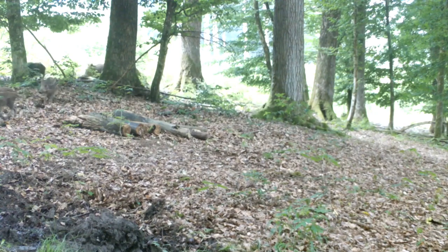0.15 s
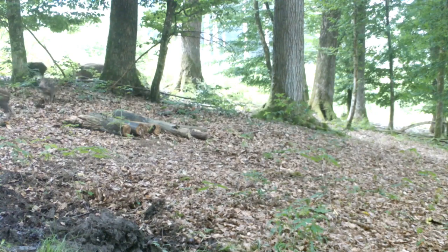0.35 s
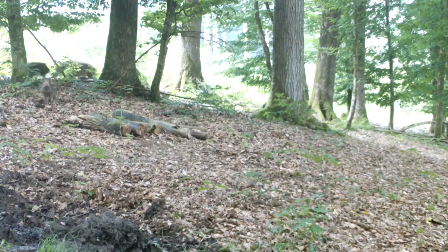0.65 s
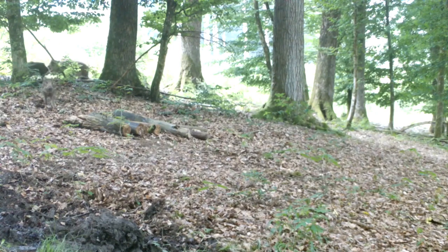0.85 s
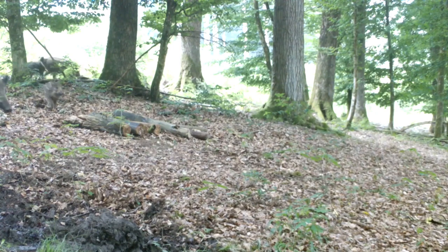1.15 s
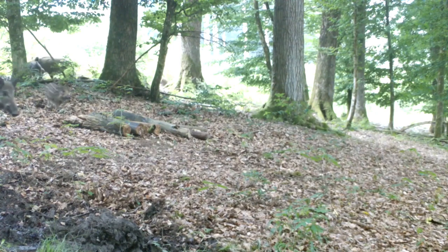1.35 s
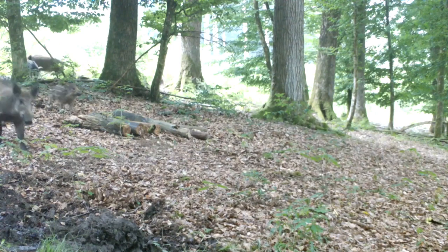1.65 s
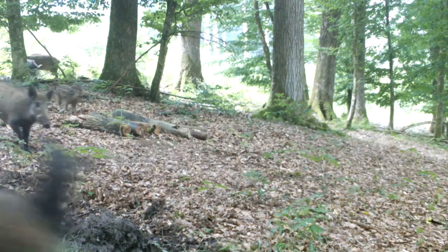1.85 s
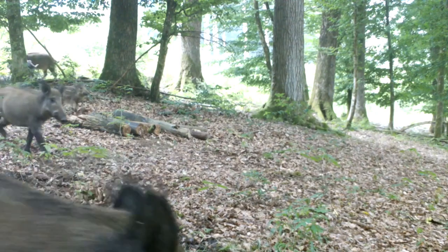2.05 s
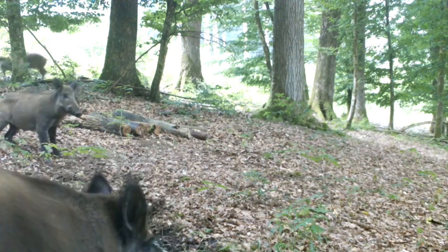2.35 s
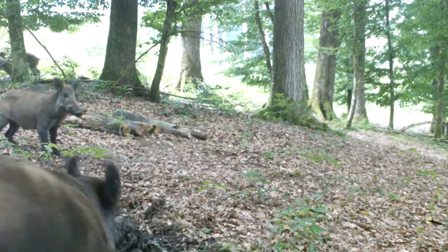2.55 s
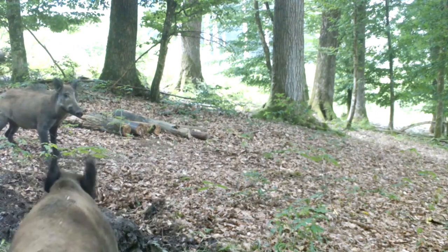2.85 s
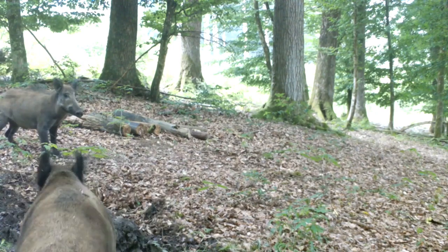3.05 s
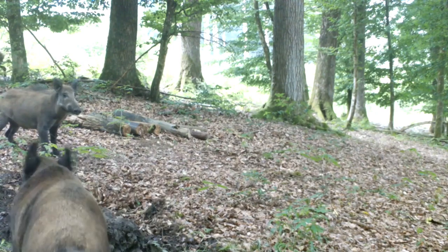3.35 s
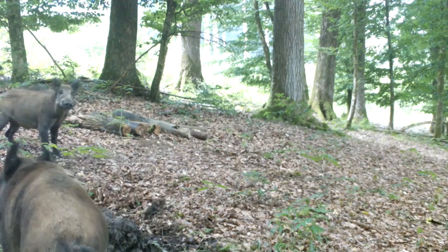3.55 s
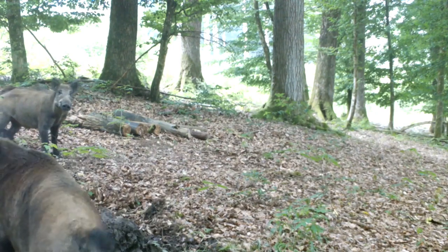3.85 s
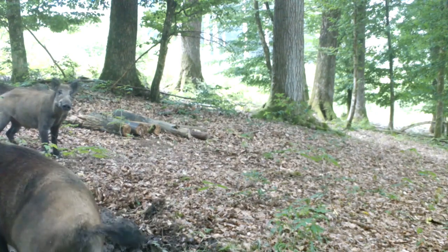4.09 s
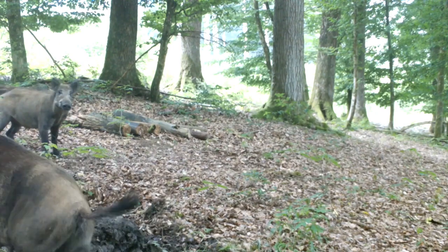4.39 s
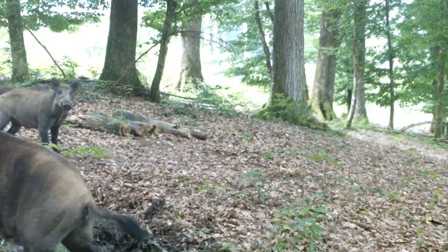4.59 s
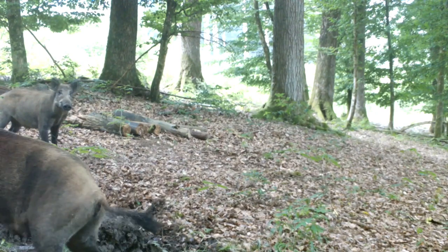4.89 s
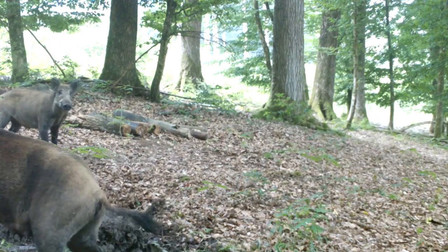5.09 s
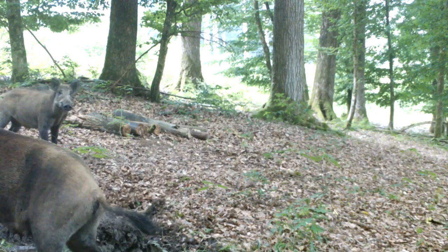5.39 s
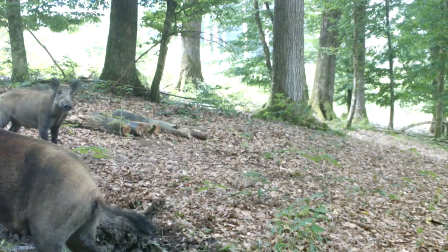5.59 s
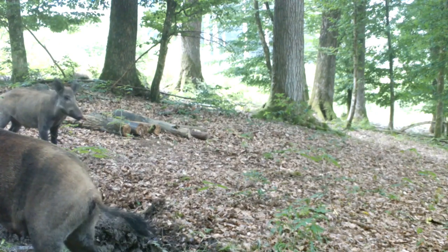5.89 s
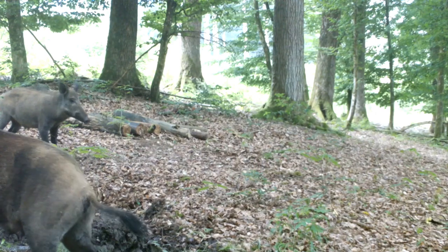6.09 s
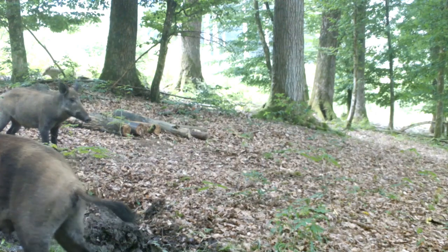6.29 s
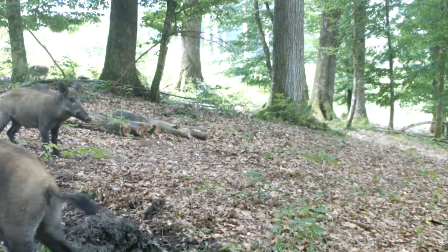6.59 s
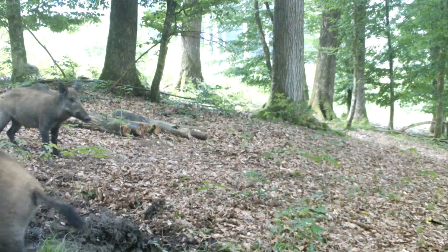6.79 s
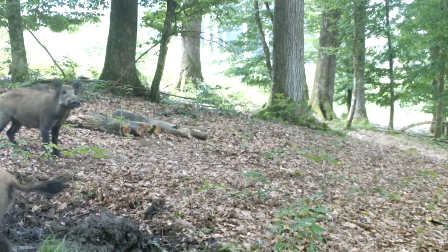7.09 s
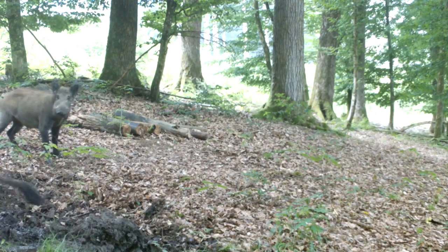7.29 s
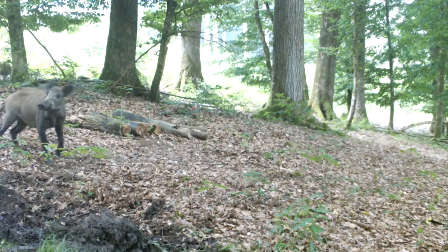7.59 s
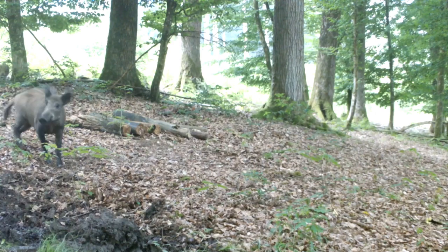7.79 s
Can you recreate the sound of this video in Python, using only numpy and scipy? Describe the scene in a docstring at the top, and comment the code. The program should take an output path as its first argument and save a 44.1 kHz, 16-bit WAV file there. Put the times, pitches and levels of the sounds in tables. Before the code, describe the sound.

Boars rustle through crackling dry leaves, snorting close by and knocking hard on the microphone housing, before the wood quietens to faint bird whistles.

```python
"""Wild boars rooting in dry leaves

Boars root about beside a camera fixed low in a wood; leaves crackle as clustered noise bursts.
Snorts are fluttering noise through throat and nostril resonances; knocks ring the housing's modes.
Twigs snap as decaying impulses through a resonance, and hoofs thud as brief low sines.
Distant birds whistle warbling, echoed sines over faint shaped-noise hiss and a low wavering hum."""
import sys
import numpy as np
from scipy import signal
from scipy.fft import rfft, irfft
from scipy.io import wavfile

SR = 44100
rng = np.random.default_rng(int(sys.argv[2]) if len(sys.argv) > 2 else 0)


def transcribe(signal):
    """Save signal, clipped to [-1, 1], as a 16-bit WAV file at the path in sys.argv[1]."""
    frames = np.atleast_2d(signal).T
    limited = np.clip(frames, -1, 1)
    pcm = np.round(limited * 32767).astype(np.int16)
    wavfile.write(sys.argv[1], SR, pcm)


N = 350154

# Spectrum of still air and microphone hiss: (frequency [Hz], relative density [dB per Hz])
AIR_SPECTRUM = [(12, -39.5), (20, -6.5), (53, -15.5), (66, -9.5), (85, -9.5), (209, -19), (247, -19),
                (674, -28.5), (775, -26), (1110, -30.5), (2720, -33.5), (2960, -31.5), (3400, -33),
                (5950, -29), (15800, -40.5)]
AIR_DB = -63
# Level of the hum: (time [s], level [dB])
HUM_LEVEL = [(0, -66.5), (1, -60.5), (3.002, -71.5), (4.2, -63), (5.3, -64.5), (6.8, -67.5), (7.9, -76.5)]
HUM_HZ = 86

# Spectra of crisp top leaves and the coarse litter beneath: (frequency [Hz], relative density [dB per Hz])
CRISP_SPECTRUM = [(100, -22.5), (400, -22.5), (1300, -22.5), (2000, -30), (3300, -13.5), (4400, -15),
                  (5600, 0), (7400, -1), (8800, -8), (10300, -15.5), (12000, -17.5), (15500, -27.5)]
COARSE_SPECTRUM = [(200, -24), (800, -11), (1300, -8.5), (1800, -18), (2400, -10), (2900, -3.5), (3550, 0),
                   (4100, -7), (6000, -31), (12000, -55.5)]
# Treble of the crisp leaves against their duller part: (time [s], level [dB])
DRYNESS = [(0, 0), (0.7, -4.5), (1.8, 4), (2.6, -3.5), (3.4, -9.5), (4.101, -1.5), (4.85, -7.5), (5.5, -1),
           (6.9, -3), (7.4, 0), (7.9, -4.5)]
# Leaves stirred steadily, before the leaf gains:
# (time [s], crisp level [dB], coarse crunch relative to crisp [dB])
STIRRING = [(0, -50.5, -10), (0.4, -51, -11), (1.0, -51.5, -14), (1.5, -51, -12), (1.8, -39, -10.5),
            (2.3, -41.5, -20), (2.9, -45.5, -15), (3.2, -47.5, -13.5), (3.58, -54, -7.5),
            (4.05, -55, -12.5), (4.601, -54.5, -12), (5.2, -60, -15.5), (5.38, -66, -8.5), (5.9, -65, -8.5),
            (6.15, -60.5, -10), (6.6, -58, -12), (7.2, -52, -11.5), (7.9, -51.5, -17.5)]
# Hoof or snout pressing into leaves, before the leaf gains:
# (start [s], time under load [s], crisp level [dB], coarse crunch relative to crisp [dB])
STEPS = [(0.01, 0.027, -42, -20), (0.095, 0.16, -43, -18), (0.31, 0.019, -47, -13),
         (0.64, 0.037, -51.5, -14), (1.11, .05, -49.5, -6), (1.365, 0.045, -36, -14),
         (1.435, 0.032, -41.5, -14), (1.74, 0.086, -35.5, -16), (1.895, 0.037, -29, -24),
         (1.965, 0.024, -34.5, -20), (2.047, 0.049, -31, -12.5), (2.085, 0.038, -24, -12.5),
         (2.12, 0.064, -20.5, -18.5), (2.22, 0.17, -36.5, -16), (2.41, 0.053, -36, -19),
         (2.52, 0.055, -39, -16.5), (2.74, 0.044, -43, -9.5), (2.794, 0.028, -39.5, -15),
         (2.995, .04, -50, -3), (3.04, 0.046, -39.5, -11), (3.3, 0.036, -50.5, -22),
         (4.12, 0.055, -49.5, -14.5), (4.275, 0.048, -42, -6), (4.395, 0.043, -49.5, -8.5),
         (4.645, 0.033, -52.5, -13), (4.79, .11, -55, -23.5), (6.66, 0.085, -54, -4),
         (6.755, .095, -55, -8.5), (6.94, .075, -48, -7.5), (7.281, 0.069, -47.5, -16),
         (7.38, .05, -47, -11), (7.519, 0.1824, -49.5, -16.5), (7.829, 0.023, -47, -2.5)]
PRESS_S, SETTLE_S = 0.017, 0.025  # rise of the load; decay constant once it is lifted

# Snorts and grunts: (start [s], length [s], level [dB], rise [s], sag over the length [dB],
# nearness [0-1], starting throat resonance [Hz], its relative level [dB], nostril hiss relative level [dB])
SNORTS = [(0.075, .064, -60.5, .023, 11, 0.8, 277, 7, -10),
          (0.95, .13, -34.5, 0.053, -0.5, .985, 260, -5.5, -4.5),
          (1.294, 0.087, -43, .03, 3.5, 0.94, 390, 1, 4), (1.502, .06, -44, .035, -4, 0.94, 516, 1.5, 6.5),
          (1.514, 0.39, -33.5, 0.059, 12.5, 0.64, 786, -3, 6.5),
          (4.173, 0.21, -60, 0.12, -7.5, 0.06, 340, -4, -13),
          (6.217, 0.35, -48, .13, 4, 0.08, 420, -18, -0.5), (6.478, 0.1, -67, .03, -2, 0.2, 416, 5.5, -15),
          (6.962, 0.13, -70, 0.059, -0.5, 0, 340, 5, -12)]
# Spectra of the snout close up, the snout a few steps off, the nostril jet and the puff of air:
# (frequency [Hz], relative density [dB per Hz])
NEAR_SNOUT = [(50, -15), (150, -6.5), (300, 1), (620, 3.5), (900, 0), (1250, -7), (1550, -12), (2400, -17),
              (3200, -11.5), (4500, -8.5), (9000, -41)]
FAR_SNOUT = [(120, -13), (270, 6.5), (450, 6.5), (750, -6.5), (1050, 6), (1320, 7), (1550, -13), (1950, 1),
             (2400, -5), (2750, 6.5), (3500, 3.5), (3800, -27), (6000, -45), (12000, -28)]
NOSTRIL_JET = [(1500, -34), (3000, -6.5), (4600, -5), (5700, 4), (7300, 2.5), (8500, -4), (10000, -13),
               (12000, -14.5), (15500, -25)]
PUFF_SPECTRUM = [(10, -13), (25, -11), (36, 4), (50, -1), (70, -15), (150, -9), (600, -61.5)]
RELEASE_SHARE, THROAT_END = 0.43, 0.87  # share of length spent dying away; final / initial resonance
WHISTLE_DB, WHISTLE_LOSS_DB = -0.5, 47  # nostril whistle at nearness 1; loss at nearness 0
PUFF_DB, PUFF_LOSS_DB = -4, 77  # the same for the puff that buffets the microphone

# Twigs snapping: (time [s], level [dB], ring [Hz], dull body relative level [dB], decay constant [s])
SNAPS = [(0.1525, -38.5, 7500, -6.5, .0023), (0.4828, -34.5, 7300, -21, .003),
         (0.6558, -31, 6800, -12.5, 0.00095), (1.442, -29.5, 7700, -27, 0.0069),
         (1.788, -22, 8000, -19, .0018), (1.8549, -6, 7400, -17.5, 0.0017),
         (1.9033, -35, 6500, -8.5, 0.0088), (2.046, -27.5, 5570, -15, 0.0053),
         (2.1307, -21, 7000, -26, .0055), (2.245, -26, 7160, -13, .002), (2.4062, -35, 3140, -3.5, 0.0048),
         (2.4452, -26, 3350, -1, 0.0011), (2.8084, -35, 5400, -8, 0.0025), (3.067, -26.5, 6300, -5, 0.0029),
         (3.32, -48.5, 2400, -20, 0.0032), (3.4282, -38.5, 6000, -24.5, .0014),
         (3.602, -51.5, 2250, -4.5, 0.0048), (3.7386, -37.5, 7300, -11.5, 0.0012),
         (4.114, -39, 5840, -10.5, 0.0015), (4.2836, -31, 8600, -25, .0015),
         (4.3062, -26, 7600, -13, 0.0024), (4.343, -47, 2900, -19, .003), (4.413, -38.5, 2880, -18, 0.002),
         (4.4462, -33.5, 6040, -27, .0045), (4.663, -38.5, 5850, -29, 0.0081),
         (6.691, -36, 6200, -11, 0.0019), (6.7188, -36.5, 5800, -11.5, 0.0018),
         (6.989, -42, 6300, -17, .0022), (7.105, -41, 2940, -14, 0.0076), (7.357, -27, 6700, -31, 0.0027),
         (7.783, -38.5, 3400, -22, 0.0038), (7.797, -42.5, 3070, -15, 0.0054),
         (7.8342, -33.5, 6100, -29, 0.0099)]
# Spectrum of the dull twig body: (frequency [Hz], relative density [dB per Hz])
TWIG_BODY = [(60, -6), (180, 0.5), (330, 2), (700, -1), (1300, 1), (2100, -11), (2800, 2), (5000, -9.5),
             (12000, -9)]

# Snout against the housing: (time [s], ring [dB], clatter [dB], hardness as cut-off [Hz],
# clatter decay constant [s], weight of the lowest modes [dB])
KNOCKS = [(0.779, -39, -29.5, 1890, 0.0081, -14), (0.8116, -3.5, -11, 2750, 0.0058, -12.5),
          (0.916, -41, -33, 1780, 0.013, -8), (1.159, -12, -16, 3386, 0.0066, -9),
          (1.1709, 2, 1.5, 8500, 0.0045, -5.5), (1.282, -28, -31.5, 2010, 0.0055, -3),
          (1.563, -7.5, -12.5, 2880, 0.0053, -26)]
# Modes of the housing: (frequency [Hz], relative level [dB], time to fall 60 dB [s])
HOUSING_MODES = [(790, -9, .05), (1000, -10, .035), (1403, -25, .09), (1600, -25, .04), (1775, -24, .05),
                 (2172, -26, .07), (2298, -22, .065), (2490, -20, .04), (2600, -22, .05), (3009, -27, .07),
                 (3262, -24, .068), (3355, -23, .08), (3635, -19, .06), (3919, -26, .11), (4108, -20, .065),
                 (4730, -19, .04), (5358, -20, .05), (5991, -17, .11), (6255, -24, .07), (6410, -18, .06),
                 (7122, -22, .08), (7516, -27, .19), (8203, -33, .095), (8823, -27, .097), (9293, -31, .11),
                 (9820, -30, .11)]
# Spectrum of the clatter: (frequency [Hz], relative density [dB per Hz])
CLATTER_SPECTRUM = [(40, -21), (180, -7.5), (460, -8), (600, -20), (820, 3.5), (1250, -9), (2700, 0.5),
                    (4000, -0.5), (6300, 0), (7200, -6), (10000, -16.5), (15500, -21.5)]

# Heavy footfalls on soft ground: (start [s], level [dB], frequency [Hz], length [s])
THUDS = [(1.781, -39, 71.5, 0.037), (1.844, -43, 94, 0.043), (2.075, -47, 82, .09), (2.235, -56, 65, 0.089),
         (2.41, -46, 108, 0.036), (2.441, -48.5, 48, 0.033)]

# Distant birds: (start [s], length [s], start pitch [Hz], end pitch [Hz], level before the echo mix [dB])
BIRDS = [(3.694, 0.37, 7290, 7190, -53.5), (4.058, .22, 5180, 5205, -53.5),
         (4.751, 0.27, 5600, 5600, -56.5), (4.911, .2, 7250, 7480, -54.5), (5.15, 0.17, 4860, 4900, -60),
         (5.371, 0.097, 4920, 4880, -65.5), (5.336, .25, 3590, 3640, -76), (5.692, .09, 2950, 2920, -70),
         (5.879, .11, 3463, 4410, -62), (7.05, .22, 5240, 5140, -60.5)]
# Rms warble at the reference pitch; it grows as this power of the starting pitch
WARBLE_HZ, WARBLE_AT_HZ, WARBLE_POWER = 24.8, 4980, 4

# Dips of the microphone's port: (centre [Hz], width [Hz], depth [0-1])
PORT_DIPS = [(880, 230, 0.5), (1985, 480, 0.4), (3894, 420, 0.3), (6320, 1300, 0.2), (10200, 540, 0.2)]
EDGE_HZ = 16000  # upper band limit


def amp(db):
    """Level law: 20 dB is a factor of ten in amplitude."""
    return 10 ** (np.asarray(db) / 20)


def unit(x):
    """Power normalisation: scales to rms 1."""
    return x / np.sqrt(np.mean(x ** 2) + 1e-20)


def add(mix, s, sound):
    """Superposition: adds a sound to the mix at time s."""
    part = mix[max(round(s * SR), 0):][:len(sound)]
    part += sound[:len(part)]


def colour(x, points):
    """Minimum-phase filtering: shapes a spectrum causally, keeping the power of white noise."""
    hz, db = np.transpose(points)
    grid = np.fft.rfftfreq(4096, 1 / SR) + 1
    gain = unit(amp(np.interp(np.log(grid), np.log(hz), db)))
    log_gain = np.log(np.r_[gain, gain[-2:0:-1]])
    # The Hilbert transform of the log gain gives the minimum phase
    taps = np.fft.ifft(np.exp(np.conj(signal.hilbert(log_gain)))).real
    return signal.oaconvolve(x, taps[:len(taps) // 2])[:len(x)]


def wander(n, rate_hz):
    """Band-limited chance: Gaussian low-pass noise of rms 1."""
    hz = np.fft.rfftfreq(n, 1 / SR)
    spectrum = rfft(rng.standard_normal(n)) * np.exp(-(hz / rate_hz) ** 2)
    return unit(irfft(spectrum, n))


def swell(t, length, rise, fall):
    """Smooth onset and release: squared-sine rise and fall."""
    onset = np.sin(np.pi / 2 * np.clip(t / rise, 0, 1)) ** 2
    release = np.sin(np.pi / 2 * np.clip((length - t) / fall, 0, 1)) ** 2
    return onset * release


def resonate(x, hz, width_hz):
    """Damped resonance: shifts a moving centre to zero, applies two equal poles and shifts back."""
    turn = np.exp(2j * np.pi * np.cumsum(hz * np.ones(len(x))) / SR)
    r = np.exp(-np.pi * width_hz / SR)
    return unit((turn * signal.lfilter([1], [1, -2 * r, r * r], x / turn)).real)


def background(waver_hz=0.76, waver_db=1.5):
    """Stationary noise and frequency modulation: even hiss beside a hum wavering in pitch and level."""
    turns = np.cumsum(HUM_HZ + waver_hz * wander(N, 11)) / SR
    hum = unit(np.sin(2 * np.pi * turns) * amp(waver_db * wander(N, 4.1)))
    hum_db = np.interp(np.arange(N) / SR, *np.transpose(HUM_LEVEL))
    hiss = colour(rng.standard_normal(N), AIR_SPECTRUM)
    return amp(hum_db) * hum + amp(AIR_DB) * hiss


def footwork():
    """Addition of powers: each step's load swells, holds and settles over steady stirring."""
    t = np.arange(N) / SR
    times, stir_db, crunch_db = np.transpose(STIRRING)
    crisp_db = np.interp(t, times, stir_db)
    coarse_db = np.interp(t, times, stir_db + crunch_db)
    power = amp([crisp_db, coarse_db]) ** 2
    t = t[:SR // 2]
    for s, length, db, crunch_db in STEPS:
        press = np.sin(np.pi / 2 * np.minimum(t / PRESS_S, 1))
        load = press * np.exp(-np.maximum(t - length, 0) / SETTLE_S)
        add(power[0], s, (amp(db) * load) ** 2)
        add(power[1], s, (amp(db + crunch_db) * load) ** 2)
    return np.sqrt(power)


def crackle(per_s, spread_db, bed):
    """Random fracture: tiny bursts of very unequal size over a blur of leaves sliding."""
    fractures = rng.random(N) < per_s / SR
    sizes = amp(spread_db * np.minimum(rng.exponential(1, N), 3.5)) * fractures
    # Each fracture's energy decays with a constant of 0.6 ms
    energy = signal.lfilter([1], [1, -np.exp(-1 / (0.0006 * SR))], sizes ** 2)
    return unit(np.sqrt(energy / energy.mean() + abs(bed)) * rng.standard_normal(N))


def leaves(crisp_level, coarse_level, split_hz=6500, uneven_db=1.0, uneven_hz=22):
    """Modulated fracture noise: crisp leaves and coarse litter give way unevenly under the animals."""
    crisp = colour(crackle(per_s=910, spread_db=3.0, bed=0.64), CRISP_SPECTRUM)
    crisp = crisp * crisp_level * amp(uneven_db * wander(N, uneven_hz))
    coarse = colour(crackle(per_s=510, spread_db=3.0, bed=0.26), COARSE_SPECTRUM)
    coarse = coarse * coarse_level * amp(uneven_db * wander(N, uneven_hz))
    dull = signal.sosfiltfilt(signal.butter(3, split_hz, fs=SR, output="sos"), crisp)
    # Half the tilt lifts the treble, half lowers the rest
    tilt = amp(np.interp(np.arange(N) / SR, *np.transpose(DRYNESS)) / 2)
    tilted = dull / tilt + (crisp - dull) * tilt
    return amp(-3.5) * tilted + amp(-4) * coarse


def ticks(activity, per_s, low_hz, high_hz, cycles, sharpness, spread_db, tick_db, most_db=12):
    """Buckling resonators: small pitched ticks, louder as the animals move more."""
    out = np.zeros(N)
    t = np.arange(SR // 50) / SR
    push = np.minimum(activity / np.median(activity), amp(most_db))
    for place, pitch, size in rng.random((int(per_s * N / SR), 3)):
        hz = low_hz * (high_hz / low_hz) ** pitch
        flick = rng.standard_normal(len(t)) * np.exp(-t * hz / cycles)
        tick = signal.lfilter(*signal.iirpeak(hz, sharpness, fs=SR), flick)
        level = push[int(place * N)] * amp(tick_db - spread_db * np.log(size + 0.058))
        add(out, place * N / SR, level * tick / abs(tick).max())
    return out


def snorts(flutter_hz=140, flutter_db=1.5, throat_width_hz=260, whistle_hz=5950, whistle_width_hz=1000):
    """Turbulent source and resonator: fluttering air excites throat and snout, with whistle and puff near."""
    out = np.zeros(N)
    t = np.arange(SR // 2) / SR
    for s, length, db, rise, sag_db, near, throat_hz, throat_db, hiss_db in SNORTS:
        flutter = unit(amp(flutter_db * wander(len(t), flutter_hz)))
        # Six independent noises share one flutter
        near_air, far_air, throat_air, jet_air, whistle_air, puff_air = (
            rng.standard_normal((6, len(t))) * flutter)
        far = 1 - near
        snout = np.sqrt(near) * colour(near_air, NEAR_SNOUT) + np.sqrt(far) * colour(far_air, FAR_SNOUT)
        gliding_hz = throat_hz * np.interp(t, [0, length], [1, THROAT_END])
        throat = amp(throat_db) * resonate(throat_air, gliding_hz, throat_width_hz)
        jet = amp(hiss_db) * colour(jet_air, NOSTRIL_JET)
        whistle = resonate(whistle_air, whistle_hz, whistle_width_hz)
        whistle *= amp(WHISTLE_DB - WHISTLE_LOSS_DB * far)
        puff = amp(PUFF_DB - PUFF_LOSS_DB * far) * unit(colour(puff_air, PUFF_SPECTRUM))
        breath = swell(t, length, rise, RELEASE_SHARE * length) * amp(db - sag_db * t / length)
        add(out, s, (snout + throat + jet + whistle + puff) * breath)
    return out


def snaps(sharpness=6.4, scatter_db=-20, scatter_s=0.011, spike=0.21, spike_s=0.00022, crack_db=-13,
          top_hz=9800, top_at_db=-32, octave_db=24):
    """Sudden release of strain: twigs crack, ring and stir leaves; litter muffles the faint ones."""
    out = np.zeros(N)
    t = np.arange(SR // 12) / SR
    for s, db, hz, body_db, decay in SNAPS:
        shape = np.exp(-t / decay) + spike * np.exp(-t / spike_s)
        crack, thump = shape * rng.choice([-1, 1], (2, len(t)))
        ring = signal.lfilter(*signal.iirpeak(hz, sharpness, fs=SR), crack)
        ring = np.sqrt(np.mean(shape ** 2)) * unit(ring)
        sharp_crack = amp(crack_db) * np.diff(crack, prepend=0) / 2
        body = amp(body_db) * colour(thump, TWIG_BODY)
        stirred = colour(rng.standard_normal(len(t)) * np.exp(-t / scatter_s), CRISP_SPECTRUM)
        # The cut-off rises one octave for each octave_db of level
        cutoff_hz = min(top_hz * 2 ** ((db - top_at_db) / octave_db), SR / 2.2)
        litter = signal.butter(2, cutoff_hz, fs=SR)
        snap = ring + sharp_crack + body + amp(scatter_db) * stirred
        add(out, s, amp(db) * signal.lfilter(*litter, snap))
    return out


def knocks(build=.0018, low_hz=1200):
    """Modal excitation: each nudge makes the housing clatter and ring; soft contact loses the treble."""
    out = np.zeros(N)
    t = np.arange(SR // 4) / SR
    attack = 1 - np.exp(-(t / build) ** 2)
    for s, ring_db, clatter_db, hard_hz, decay, weight_db in KNOCKS:
        ring = np.zeros(len(t))
        for hz, db, t60 in HOUSING_MODES:
            mode_level = amp(db + weight_db * (hz < low_hz) - 60 * t / t60)
            ring += mode_level * np.sin(2 * np.pi * (hz * t + rng.random()))
        clatter = colour(rng.standard_normal(len(t)) * np.exp(-t / decay), CLATTER_SPECTRUM)
        contact = signal.butter(3, hard_hz, fs=SR)
        blow = attack * (amp(ring_db) * ring + amp(clatter_db) * clatter)
        add(out, s, signal.lfilter(*contact, blow))
    return out


def thuds():
    """Heavily damped motion: soft ground gives for a few cycles under a hoof."""
    out = np.zeros(N)
    for s, db, hz, length in THUDS:
        t = np.arange(0, length, 1 / SR)
        add(out, s, amp(db) * np.sin(2 * np.pi * hz * t) * np.sin(np.pi * t / length) ** 2)
    return out


def birds(t60=.7):
    """Frequency modulation and scattering: thin warbling whistles smeared by echoes from the trunks."""
    out = np.zeros(N)
    for s, length, start_hz, end_hz, db in BIRDS:
        t = np.arange(0, length, 1 / SR)
        warble = WARBLE_HZ * (start_hz / WARBLE_AT_HZ) ** WARBLE_POWER * wander(len(t), 85)
        hz = start_hz + (end_hz - start_hz) * t / length + warble
        whistle = np.sin(2 * np.pi * np.cumsum(hz) / SR)
        add(out, s, amp(db) * swell(t, length, rise=.035, fall=0.032) * whistle)
    trunks = rng.standard_normal(SR) * amp(-60 * np.arange(SR) / SR / t60)
    echoes = signal.oaconvolve(out, trunks / np.linalg.norm(trunks))[:N]
    return .75 * out + .7 * echoes


def port(x):
    """Interference: the narrow opening before the microphone partly cancels a few bands."""
    for hz, width, depth in PORT_DIPS:
        x = x - depth * signal.lfilter(*signal.iirpeak(hz, hz / width, fs=SR), x)
    return x


def scene():
    """Two transmission paths: airborne sound enters by the port, knocks travel through the housing."""
    crisp, coarse = footwork()
    single_leaves = ticks(crisp, per_s=30, low_hz=3400, high_hz=10500, cycles=3.4, sharpness=3,
                          spread_db=3.5, tick_db=-48)
    small_sticks = ticks(coarse, per_s=9, low_hz=2000, high_hz=3900, cycles=8.7, sharpness=6,
                         spread_db=2.5, tick_db=-54)
    litter = leaves(crisp, coarse) + single_leaves + small_sticks
    airborne = litter + snorts() + snaps() + birds()
    return (background() + port(airborne) + knocks() + thuds())[None]


def record(dry, ceiling=0.64):
    """Saturation and band limiting: loud peaks overload softly, then the top is cut."""
    limited = ceiling * np.tanh(dry / ceiling)
    lowpass = signal.firwin(511, EDGE_HZ, window=("kaiser", 9), fs=SR)
    return signal.oaconvolve(limited, lowpass[None], "same")


dry = scene()
out = record(dry)
transcribe(out)
```